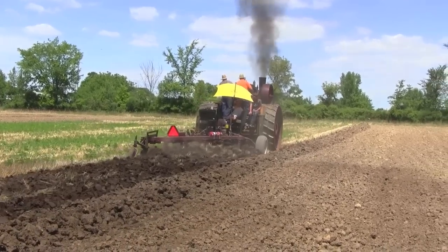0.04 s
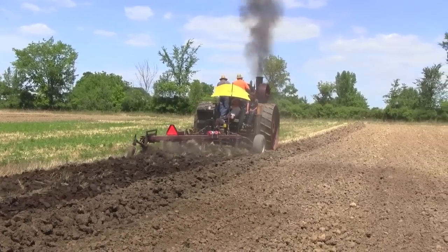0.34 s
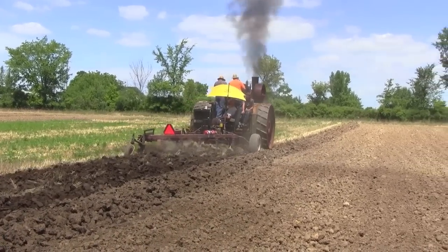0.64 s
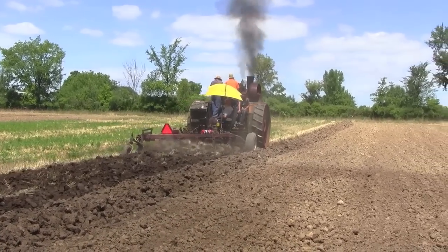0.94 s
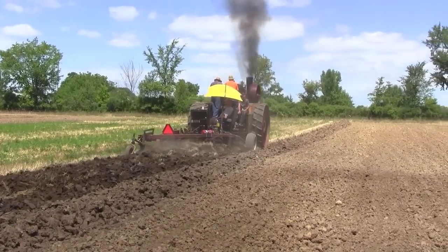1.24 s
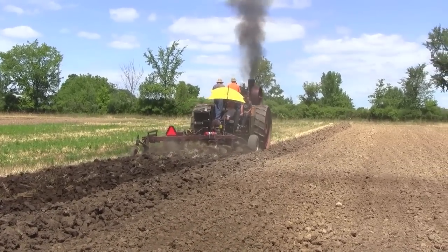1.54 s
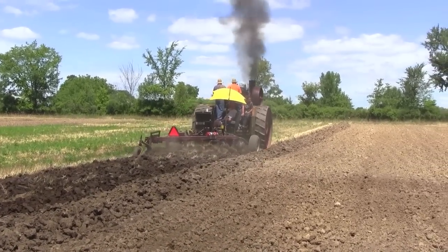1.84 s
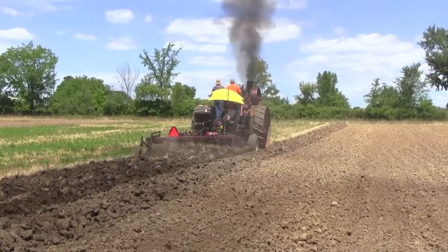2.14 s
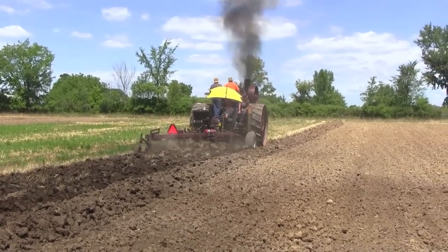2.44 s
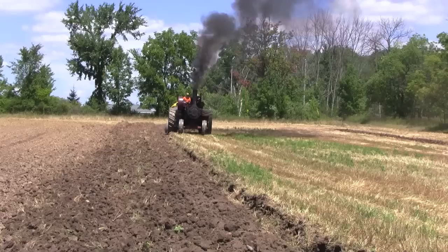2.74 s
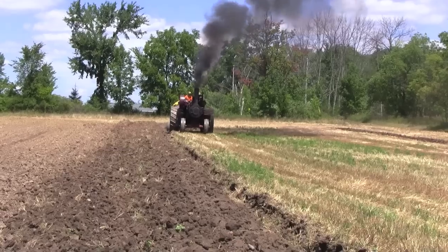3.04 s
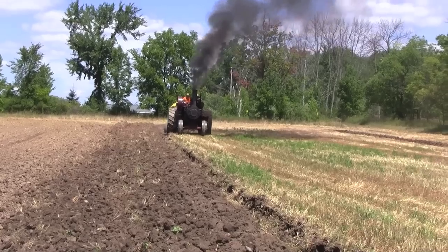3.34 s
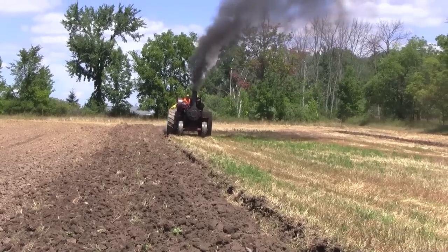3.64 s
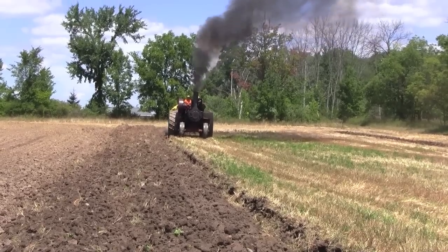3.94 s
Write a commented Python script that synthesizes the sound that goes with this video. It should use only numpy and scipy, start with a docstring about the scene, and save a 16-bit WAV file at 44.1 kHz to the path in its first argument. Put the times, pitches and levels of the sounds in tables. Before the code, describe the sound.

A steam traction engine chuffs about eight times a second in an open field. Until about 2.8 seconds it is heard from behind: sharp, slightly hollow chuffs over machine rumble and a loud, wavering hiss of leaking steam. After an instant of silence, it returns from the front at 2.9 seconds, with duller chuffs, rumble and a small combustion engine puttering quickly nearby until about 4 seconds.

```python
"""An open field: a steam traction engine ploughs, chuffing about eight times a second.
Each exhaust stroke sends a steam burst up the chimney, rings its air column and scatters back.
Heard first from behind: sharp chuffs, rumble, loud hiss of leaking steam. After a brief fade to
silence, from the front: duller chuffs, with a small combustion engine puttering nearby."""
import sys
import numpy as np
from scipy import signal
from scipy.fft import rfft, irfft
from scipy.io import wavfile

SR = 44100
rng = np.random.default_rng(int(sys.argv[2]) if len(sys.argv) > 2 else 0)


def file_out(sig):
    """Save sig as 16-bit WAV at sys.argv[1]."""
    # one column per channel
    cols = np.atleast_2d(sig).T
    # limit, then scale
    lim = np.clip(cols, -1, 1)
    pcm = np.round(lim * 32767).astype(np.int16)
    wavfile.write(sys.argv[1], SR, pcm)


N = 176400
TIME_S = np.arange(N) / SR
FREQS_HZ = np.maximum(np.arange(N // 2 + 1) * SR / N, 1)

# Exhaust strokes. Each row: start in seconds, low-band gain in dB, treble gain in dB,
# hold in seconds, relative ring level in dB, ring pitch in Hz.
REAR_CHUFFS = [(0.018, -1, -2.5, 0.018, -23, 223), (0.132, -0.5, 1, 0.013, -20.5, 207),
               (0.263, -1, 5, 0.0063, -23.5, 216), (0.371, -1.5, -0.5, 0.02, -19, 206),
               (0.502, -1, -3, 0.013, -28, 203.0), (0.608, 0.5, 0.7, 0.015, -23.5, 210),
               (0.733, -2, -2.5, 0.023, -17.5, 207.4), (0.843, -0.5, 5.5, 0.0066, -23.5, 188),
               (0.966, -0.5, 1.5, 0.018, -26.5, 215), (1.084, -0.7, 3.4, 0.011, -29.0, 202),
               (1.208, -3.0, -0.8, 0.023, -23.5, 208.0), (1.317, 0.5, -1.5, 0.019, -19.5, 204.0),
               (1.442, 0.5, 1, 0.014, -25.5, 199.5), (1.552, 0.5, 2.2, 0.012, -23, 206),
               (1.676, 0, -2, 0.017, -34, 204), (1.788, -0.5, 0.2, 0.017, -20.5, 221),
               (1.911, 0.4, -0.5, 0.014, -21.5, 198), (2.023, 0.2, 3.5, 0.011, -22.5, 200),
               (2.148, -1.1, -1.9, 0.017, -17.5, 217.3), (2.259, 2.5, 3, 0.006, -24, 197.3),
               (2.381, -2.5, -2, 0.017, -23, 220), (2.493, -1.5, -5, 0.024, -27.5, 195),
               (2.622, 1.2, -0.8, 0.019, -23, 202.5), (2.725, -5, -1.5, 0.021, -29, 215)]
FRONT_CHUFFS = [(2.982, 2, 1.3, 0.016, -20.5, 198), (3.106, -1, 0.5, 0.024, -27, 207),
                (3.211, -1.3, 1, 0.031, -35, 200), (3.342, -2, -0.5, 0.018, -29, 210),
                (3.458, 4.5, 2.5, 0.0078, -21.0, 195), (3.581, 3, 0.3, 0.0038, -20.5, 198.3),
                (3.691, 2.4, -3, 0.026, -34.0, 210.0), (3.819, 3.3, -0.5, 0.0045, -21.5, 202),
                (3.924, -1.7, 0.2, 0.025, -29, 217)]
# Spectra of blast, scattered tail, machine rumble, steam leak and small-engine pop.
# Each row: frequency in Hz, relative density in dB.
REAR_BLAST_DB = [(40, -76), (130, -53), (200, -51), (280, -51), (360, -48.5), (450, -49.5), (580, -46),
                 (690, -40), (900, -51.5), (1100, -46), (1300, -52.5), (1600, -48.5), (2300, -52.5),
                 (3400, -55), (4800, -61), (8000, -60.5), (12000, -71), (15000, -77)]
REAR_TAIL_DB = [(130, -64.5), (200, -44), (280, -60.5), (365, -54), (470, -61.5), (690, -50.5), (950, -57),
                (1600, -73.5), (3000, -69), (8000, -85)]
REAR_RUMBLE_DB = [(20, -72), (45, -63), (100, -57), (160, -55), (210, -58), (290, -64), (370, -68),
                  (480, -87), (700, -61), (900, -65), (1300, -57), (1800, -57), (2350, -53), (2900, -59.5),
                  (4000, -66.5), (8000, -100)]
FRONT_BLAST_DB = [(130, -69), (200, -56), (290, -51), (375, -46), (470, -52.5), (620, -46.5), (760, -38.5),
                  (950, -47.5), (1150, -47), (1600, -50.5), (2200, -62.5), (3200, -59.5), (5000, -71),
                  (8000, -69.5), (11000, -77), (15000, -98)]
FRONT_TAIL_DB = [(130, -75), (200, -67), (300, -51.5), (750, -44.5), (1200, -70), (2200, -64), (3500, -71),
                 (8000, -80.5), (14000, -96)]
FRONT_RUMBLE_DB = [(20, -76), (45, -72), (70, -53), (100, -59), (180, -48.5), (280, -58), (750, -54.5),
                   (1150, -49.5), (2200, -67), (5000, -75), (8000, -77.5), (15000, -106)]
HISS_DB = [(2900, -70.5), (3300, -68), (3800, -75.5), (4200, -64), (4500, -67), (4800, -61), (5400, -69),
           (5900, -67), (6300, -63.5), (6900, -64), (7400, -64.5), (7800, -66), (8500, -62.5), (9100, -68),
           (10200, -63.5), (12000, -63.5), (13200, -70), (14000, -72), (15300, -87)]
POP_DB = [(150, -60), (280, -55), (370, -48.5), (520, -56.5), (760, -45), (1150, -51), (1550, -59),
          (2200, -70), (3500, -67.5), (8000, -86), (14000, -102)]
# Leak swell. Each row: time in seconds, lower hiss gain in dB, upper hiss gain in dB.
HISS_SWELL_DB = [(0.04, 2.5, 5.5), (0.22, -2.5, 1.5), (0.56, -4.5, 0.5), (0.8, 2.5, -0.5), (1.05, -1, 1.5),
                 (1.18, 1.5, 3.5), (1.4, 1, -3), (1.55, 3.5, -3), (1.75, 2, 3), (1.88, 0.5, -1.5),
                 (2.1, -0.5, 0), (2.3, 2.5, 1), (2.4, 0, 7), (2.52, 2.5, -1), (2.71, 0.5, -5.5)]
# Blend from lower to upper hiss: start in Hz, end in Hz.
HISS_CROSSOVER_HZ = (5360, 9300)
# Small-engine hum. Each row: multiple of the firing rate, level in dB.
REAR_HUM_DB = [(2, -39.5), (3, -47)]
FRONT_HUM_DB = [(2, -29.5), (3, -33), (4, -39)]
# Small-engine accents. Each row: start in seconds, gain in dB.
ACCENT_POPS = [(2.875, -9), (2.924, 3.5), (2.948, 0), (3.027, 2.5), (3.051, 2.5), (3.311, -1), (3.385, 4.5),
               (3.513, -10), (3.538, -2.5), (3.565, 3), (3.666, -9), (3.789, 2.5), (3.967, 5.5)]
# Stereo balance. Each row: frequency in Hz, left minus right in dB.
BALANCE_DB = [(2400, 0), (4400, .5), (8100, -1.3), (12000, 2.1), (15000, 2.5)]
# Base stereo width. Each row: frequency in Hz, side minus mid in dB.
WIDTH_DB = [(60, -23), (200, -37), (350, -20), (700, -30), (1400, -50.5), (3000, -37.5), (5000, -19),
            (8000, -10.5), (12000, -4.5), (15000, -28)]
# Added width at the front. Each row: frequency in Hz, side gain in dB.
FRONT_WIDER_DB = [(200, -1.5), (700, 6), (1300, 28.5), (2400, 34), (4400, 7), (8000, 3.5), (14000, 6)]

FRONT_FIRING_HZ, REAR_FIRING_HZ, POP_ANCHOR_S = 39.25, 37.0, 2.874
BLAST_ATTACK_S, RING_DECAY_S = 0.005, 0.02
TREBLE_SPLIT_HZ, CUTOFF_HZ = 2330, 15600
REAR_END_S, FRONT_ON_S, FRONT_FULL_S = 2.776, 2.826, 2.876
FADE_OUT_DB_PER_S, FADE_IN_DB_PER_S = 2602, 533


def from_db(db):
    """Decibels to gain."""
    return 10 ** (np.asarray(db) / 20)


def per_bin(points):
    """Table interpolated to every FFT bin, log frequency axis."""
    hz, value = np.transpose(points)
    return np.interp(np.log(FREQS_HZ), np.log(hz), value)


def drift(rate_hz):
    """Low-passed random signal, unit spread."""
    slow = irfft(rfft(rng.standard_normal(N)) / (1 + (FREQS_HZ / rate_hz) ** 2), N)
    return slow / slow.std()


def noise(spectrum_db):
    """Shaped stereo noise, wider in the treble."""
    mid, side = rfft(rng.standard_normal((2, N)))
    signs = np.array([[1], [-1]])
    pair = mid + signs * side * from_db(per_bin(WIDTH_DB))
    gain = from_db(per_bin(spectrum_db) + signs * per_bin(BALANCE_DB) / 2)
    return irfft(pair * gain, N) * np.sqrt(SR / 2)


def envelope(t, attack_s, hold_s, decay_s):
    """Smooth rise centred on t = 0, hold, exponential decay."""
    return (1 + np.tanh(t / attack_s)) / 2 * np.exp(-np.maximum(t - hold_s, 0) / decay_s)


def widened(pair, extra_db):
    """Side signal scaled band by band."""
    side = irfft(rfft(pair[0] - pair[1]) / 2 * from_db(per_bin(extra_db)), N)
    return pair.mean(axis=0) + np.array([side, -side])


def rumble(spectrum_db, gain_db, rough_db, rough_hz):
    """Continuous machine noise with a flickering level."""
    return from_db(gain_db + rough_db * drift(rough_hz)) * noise(spectrum_db)


def small_engine_hum(firing_hz, harmonics, waver_db):
    """Low exhaust harmonics, each wavering in level."""
    phase = 2 * np.pi * firing_hz * TIME_S + 0.096 * drift(3)
    out = 0
    for order, db in harmonics:
        amplitude = np.sqrt(2) * from_db(db + waver_db * drift(4.7))
        out += amplitude * np.sin(order * phase + rng.uniform(0, 2 * np.pi))
    return out


def small_engine_pops(usual_db, hold_s, decay_s):
    """One exhaust pop per firing; some stand out."""
    period_s = 1 / FRONT_FIRING_HZ
    starts_s = np.arange(POP_ANCHOR_S - 2 * period_s, TIME_S[-1], period_s)
    pops = [(s, usual_db + rng.normal()) for s in starts_s] + ACCENT_POPS
    pulses = [from_db(db) * envelope(TIME_S - s, 0.00033, hold_s, decay_s) for s, db in pops]
    return noise(POP_DB) * np.max(pulses, axis=0)


def steam_leak(patchy_db, flutter_db):
    """Steady jet; narrow bands swell and fade separately in the moving air."""
    jet = rfft(noise(HISS_DB)) / (1 + (2600 / FREQS_HZ) ** 6)  # high-pass
    centres_hz = np.linspace(2500, 14000, num=36)
    times_s, *gains_db = np.transpose(HISS_SWELL_DB)
    lower_db, upper_db = [np.interp(TIME_S, times_s, db) for db in gains_db]
    out = 0
    for hz, share in zip(centres_hz, np.eye(len(centres_hz))):
        band = irfft(jet * np.interp(FREQS_HZ, centres_hz, share), N)
        swell_db = lower_db + (upper_db - lower_db) * np.interp(hz, HISS_CROSSOVER_HZ, (0, 1))
        out += band * from_db(swell_db + patchy_db * drift(4.5))
    return out * from_db(flutter_db * drift(32))


def scattered_tails(chuffs, spectrum_db, lag_s, decay_s, rough_db):
    """Each blast returns off the machine, ground and trees."""
    level = sum(from_db(db) * envelope(TIME_S - s - lag_s, 0.011, 0.022, decay_s)
                for s, db, *_ in chuffs)
    return noise(spectrum_db) * level * from_db(rough_db * drift(83))


def chimney_ring(chuffs, attack_s, hold_s, waver_rad):
    """The chimney's air column swells and rings unsteadily after each blast."""
    wander_rad = waver_rad * drift(34)
    out = 0
    for start_s, *_, db, hz in chuffs:
        t = TIME_S - start_s
        tone = np.sin(2 * np.pi * hz * t + rng.uniform(0, 2 * np.pi) + wander_rad)
        out += from_db(db) * envelope(t - 0.003, attack_s, hold_s, RING_DECAY_S) * tone
    return out * from_db(1.1 * drift(36))


def exhaust_blasts(chuffs, spectrum_db, decay_s, treble_decay_s, rough_db):
    """One turbulent steam burst up the chimney per stroke; treble has its own envelope."""
    jet = noise(spectrum_db)
    treble = irfft(rfft(jet) / (1 + (TREBLE_SPLIT_HZ / FREQS_HZ) ** 4), N)
    low_gain = treble_gain = 0
    for start_s, low_db, treble_db, hold_s, *_ in chuffs:
        t = TIME_S - start_s
        low_gain += from_db(low_db) * envelope(t, BLAST_ATTACK_S, hold_s, decay_s)
        treble_gain += from_db(treble_db) * envelope(t, BLAST_ATTACK_S, hold_s, treble_decay_s)
    return ((jet - treble) * low_gain + treble * treble_gain) * from_db(rough_db * drift(80))


def from_behind():
    """Sharp chuffs, loud hiss, rumble; the small engine is a faint hum."""
    return (exhaust_blasts(REAR_CHUFFS, REAR_BLAST_DB, decay_s=0.017, treble_decay_s=0.011, rough_db=1.25)
            + scattered_tails(REAR_CHUFFS, REAR_TAIL_DB, lag_s=0.017, decay_s=0.1, rough_db=1.4)
            + from_db(3.5) * chimney_ring(REAR_CHUFFS, attack_s=0.02, hold_s=0.04, waver_rad=0.29)
            + rumble(REAR_RUMBLE_DB, gain_db=-5.4, rough_db=1.34, rough_hz=45)
            + steam_leak(patchy_db=2.8, flutter_db=0.95)
            + small_engine_hum(REAR_FIRING_HZ, REAR_HUM_DB, waver_db=1.5))


def from_front():
    """Duller chuffs over rumble and the small engine's putter."""
    return (exhaust_blasts(FRONT_CHUFFS, FRONT_BLAST_DB,
                           decay_s=0.014, treble_decay_s=0.023, rough_db=3.07)
            + from_db(-4.5) * scattered_tails(FRONT_CHUFFS, FRONT_TAIL_DB,
                                              lag_s=0.028, decay_s=0.031, rough_db=2.5)
            + from_db(3.5) * chimney_ring(FRONT_CHUFFS, attack_s=0.017, hold_s=0.045, waver_rad=0.19)
            + rumble(FRONT_RUMBLE_DB, gain_db=-2.0, rough_db=2.8, rough_hz=54)
            + small_engine_pops(usual_db=-2, hold_s=0.0066, decay_s=0.005)
            + small_engine_hum(FRONT_FIRING_HZ, FRONT_HUM_DB, waver_db=0.5))


def scene():
    """Rear fades out, front fades in, over a faint noise floor."""
    fade_out = from_db(-FADE_OUT_DB_PER_S * np.maximum(TIME_S - REAR_END_S, 0))
    fade_in = from_db(-FADE_IN_DB_PER_S * np.maximum(FRONT_FULL_S - TIME_S, 0)) * (TIME_S > FRONT_ON_S)
    floor = noise([(30, -112), (300, -100), (1500, -112), (6000, -135)])
    return from_behind() * fade_out + widened(from_front(), FRONT_WIDER_DB) * fade_in + floor


def record(dry):
    """Soft clip, then steep low-pass."""
    rounded = dry / (1 + np.abs(dry) ** 6) ** (1 / 6)
    return signal.sosfilt(signal.ellip(12, .1, 90, CUTOFF_HZ, fs=SR, output="sos"), rounded)


dry = scene()
out = record(dry)
file_out(out)
```